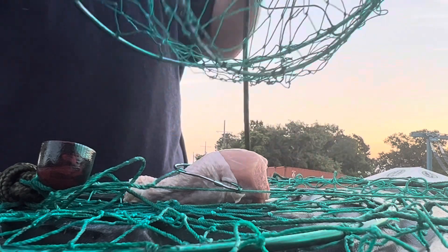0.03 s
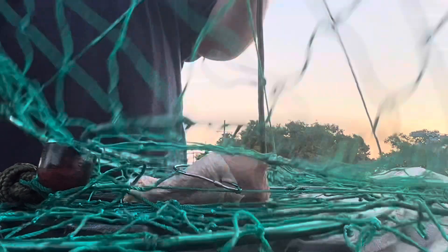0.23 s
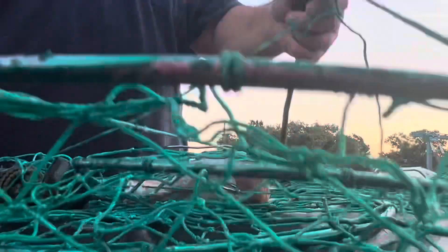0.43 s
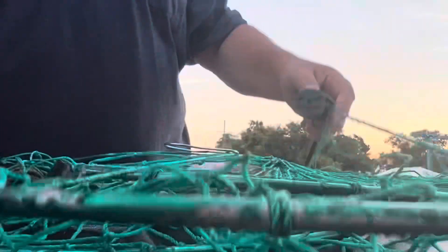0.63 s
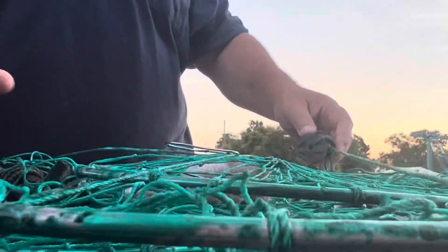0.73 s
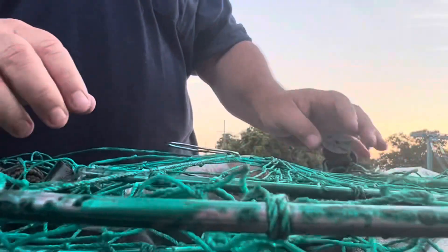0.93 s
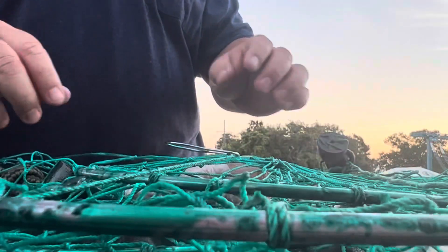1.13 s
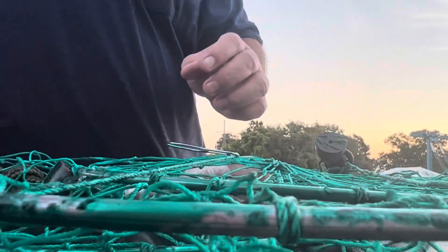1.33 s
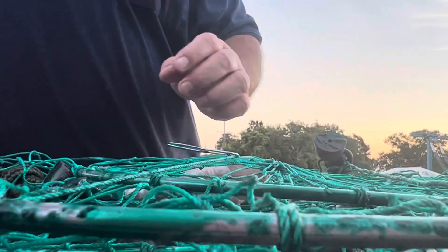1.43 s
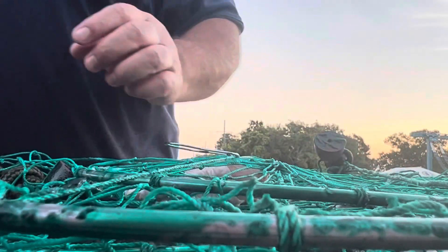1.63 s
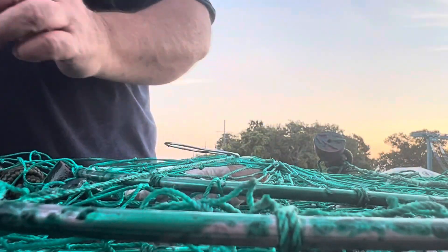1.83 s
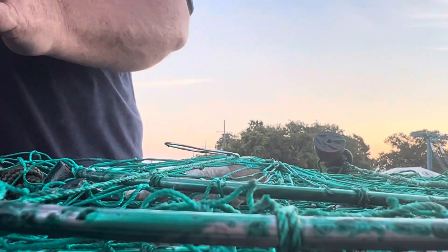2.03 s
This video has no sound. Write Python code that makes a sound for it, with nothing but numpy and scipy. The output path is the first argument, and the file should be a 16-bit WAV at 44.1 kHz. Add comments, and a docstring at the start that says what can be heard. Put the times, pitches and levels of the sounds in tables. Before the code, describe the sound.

A netted metal trap slams shut with a clatter, then its netting crackles softly.

```python
"""Shutting a wire crab trap

Close to a stereo microphone, the metal hoop of a netted trap slams onto its frame, bounces and settles,
and the stack of traps under it booms. A hand presses the float down; cord swishes through the mesh,
the frame ticks and the netting crackles. Farther off lie a bird's falling whistles and a soft rumble."""
import sys
import numpy as np
from scipy import signal
from scipy.fft import rfft, irfft, next_fast_len
from scipy.io import wavfile
from scipy.ndimage import map_coordinates

SR = 44100
rng = np.random.default_rng(int(sys.argv[2]) if len(sys.argv) > 2 else 0)


def wrap_up_sound(samples):
    """Save the sound to the file named by the first command line argument, as 16-bit audio."""
    columns = np.atleast_2d(samples).T
    # keep every value between -1 and 1, then stretch to whole-number steps
    tamed = np.clip(columns, -1, 1)
    steps = np.round(tamed * 32767).astype(np.int16)
    wavfile.write(sys.argv[1], SR, steps)


N = 92610

# Hoop on frame. Each row: start in seconds, level in dB, hardness in Hz (half the low-pass cutoff),
# low cut in Hz, share of the ring time, leftward bias in dB.
HOOP_BLOWS = [(0.2243, -10, 8100, 840, 0.48, 2.5), (0.2256, -2, 1200, 435, 0.1, 12.5),
              (.249, -16, 520, 198, 0.65, -1.5), (0.273, -19.5, 600, 149.8, 0.23, 6.5),
              (0.3406, -12.5, 6950, 674, 0.94, 8.5), (0.345, -22.5, 294, 202, 1, -4),
              (.361, -22.5, 1760, 199, 0.87, 5.5), (.377, -22, 1200, 299, 0.72, 4),
              (0.4193, -17, 1180, 316, 0.6, 6), (.427, -18, 600, 197, 0.63, 3.5),
              (0.474, -30, 447, 203, 1, 1), (0.483, -24.5, 800, 200, 0.41, 3.5),
              (0.6, -30, 508, 128, 0.85, 2.5), (0.625, -27, 497, 130, 0.62, 3.5),
              (0.6555, -28, 920, 168, 0.61, -1), (.681, -26.5, 140, 113, 0.81, 0)]
# Ring of the frame and of the steel rod. Each row: pitch in Hz, level in dB, t60 in seconds.
FRAME_MODES = [(194, 1, 0.26), (256, -0.5, 0.18), (286.3, -8, 0.23), (305, -3, 0.18), (351, -5, .16),
               (368, -5, 0.26), (422.5, -3, 0.21), (487.6, -15, 0.15), (568.5, -12, 0.17),
               (599.2, -8.5, 0.15), (634, -10, 0.17), (784, -11, 0.16), (838, -8, 0.12), (904, -2.5, 0.085),
               (985, -7.5, 0.14), (1132, -6.5, 0.066), (1237, -11.5, 0.083), (1438, -16, .08),
               (1586, -15.5, .12), (1759, -10.5, 0.084), (2160, -27, 0.061), (2280, -11, 0.042),
               (2572, -13, 0.075), (4125, -16, 0.055)]
ROD_MODES = [(2570, -7, .3), (3820, -6.5, 0.38), (4640, 4.5, 0.2)]
# A faint tone just before the slam, then hollow knocks of the hoop's tube.
# Each row: start in seconds, level in dB, pitch in Hz, t60 in seconds.
HOLLOW_TONES = [(0.209, -32.5, 486, 0.15), (.2238, -10.5, 930, 0.015), (0.2246, -3, 547, 0.025),
                (0.2298, -6.5, 310, 0.025), (0.2497, -7.5, 303, 0.071), (.2715, -10, 443, 0.026),
                (0.341, -10, 349.4, .14), (0.4201, -17, 424, 0.067), (.477, -23.5, 375, .06),
                (.626, -34, 589, .05), (0.6567, -21, 370.5, .14)]
# Ring of the tube. Each row: pitch ratio, level in dB, share of the ring time.
TUBE_MODES = [(1, 0, 1), (1.7, -12.5, 0.45), (3.02, -18, 0.44)]
# The stack booms; the frame ticks and a hand bumps it twice near 1.8 s. Each row: start in seconds, level in
# dB, pitch in Hz.
STACK_BOOMS = [(0.228, -12, 95.5), (0.232, -22.5, 43), (0.274, -13.5, 100.5), (0.353, -11.5, 94.1),
               (0.395, -15.5, 104.5), (0.439, -13, 100.9), (0.505, -16, 101.8), (0.595, -17, 102.2),
               (0.639, -11, 101.6), (0.704, -24.5, 130.2)]
CONTACT_TICKS = [(1.125, -42, 800), (1.135, -55.5, 1620), (1.197, -33.5, 704), (1.618, -40.5, 900),
                 (1.803, -41.5, 477), (1.814, -39, 400)]
# Ring of the stack. Each row: pitch ratio, level in dB, t60 in seconds.
STACK_MODES = [(.47, -25, 0.74), (1.002, 6.5, 0.15), (1.298, -7.5, 0.24), (2.031, -14, 0.25)]
# Hand on the float. Each row: centre in seconds, level in dB, pitch in Hz, half width in seconds.
FLOAT_THUDS = [(.768, -39, 137, 0.0062), (.881, -23, 126.6, 0.0097), (.925, -38, 141, 0.024),
               (.985, -43, 62.7, 0.014)]
# Short sounds, near and far. Each row: start in seconds, level in dB.
NET_SNAPS = [(1.768, -43), (1.777, -56), (1.818, -39.5), (1.8304, -30), (1.845, -41), (1.884, -36.5),
             (1.911, -37.5), (1.937, -41), (1.99, -47.5), (2.012, -43), (2.021, -45.5), (2.075, -47),
             (2.083, -48.5)]
ROD_SCRAPES = [(0.343, -58), (0.419, -53), (0.515, -50)]
BIRD_WHISTLES = [(.97, -64.5), (1.054, -68)]
# Rise and fall of netting and cord. Each row: time in seconds, level in dB.
RUSTLE_LEVELS = [(.18, -87), (.21, -52), (.223, -30.5), (.24, -44), (.252, -32), (.28, -46.5), (.32, -56),
                 (.338, -39.5), (.40, -73), (.9, -75.5), (1.735, -67.5), (1.775, -51), (1.84, -53.5),
                 (1.87, -69.5), (1.9, -59.5), (1.975, -74), (2.015, -49), (2.05, -65), (2.09, -55.5)]
SWISH_LEVELS = [(.15, -68.5), (.3, -45.5), (.5, -55.5), (.62, -49), (.74, -49.5), (.84, -53), (.93, -64),
                (1.05, -70.5)]
# Tone colour of each noise. Each row: frequency in Hz, relative level in dB.
CLANK_COLOUR = [(60, 3.5), (180, 3), (400, 2.5), (720, -9), (1000, 3), (1500, -8.5), (2500, -9.5),
                (3400, -15), (5300, -12), (8300, -17), (10500, -47.5), (15000, -57.5)]
TWINE_COLOUR = [(200, -4.5), (700, 6.5), (1300, 3.5), (2200, 5.5), (3800, -0.5), (5500, -1), (8500, -6),
                (10000, -27.5), (15000, -15.5)]
SNAP_COLOUR = [(1500, -15), (4500, 3), (8700, 7.5), (10000, -11), (15000, -8.5)]
CORD_COLOUR = [(300, 25), (1000, 6.5), (2500, -3), (4500, 5), (6500, 4), (8500, 1), (10000, -21),
               (12000, -6.5), (15000, -23.5)]
RUMBLE_COLOUR = [(25, -15.5), (60, -1.5), (117, -1), (150, -11), (335, -11), (550, -15.5), (800, -16.5),
                 (1200, -31), (2000, -36.5), (6500, -40), (8000, -72.5), (10000, -65), (12000, -44),
                 (16000, -60)]
HISS_COLOUR = [(3500, -18.5), (4300, -2), (5200, -19.5), (6200, 4), (6800, 5.5), (7300, -55), (9000, -19.5)]
# Decay in the wires and in the yard. Each row: frequency in Hz, t60 in seconds.
CLANK_T60 = [(150, 0.73), (500, 0.051), (1500, 0.15), (4000, 0.065), (10000, 0.015)]
YARD_T60 = [(150, 0.074), (500, 0.74), (2000, .35), (8000, 0.23)]
# Likeness of left and right for near and far noise. Each row: frequency in Hz, correlation.
NEAR_LIKENESS = [(100, 0.35), (300, 1), (1000, 0.31), (2500, 0.185), (7000, 0.099)]
FAR_LIKENESS = [(100, 0.97), (300, 0.56), (700, 0.23), (1500, -0.16), (5000, -0.24)]
# Tilt of the microphone's stereo colouring. Each row: frequency in Hz, left over right in dB.
STEREO_TILT = [(300, 0), (600, 7), (900, 3), (1200, -3), (2400, 0.5), (3200, 2.5), (4600, 6), (6000, 5.5),
               (7500, -3.5), (14000, -4.5)]
# Phase shift of its stereo processing. Each row: frequency in Hz, lead of the left side in radians.
STEREO_PHASE = [(100, 0.5), (300, 1), (550, 0.85), (900, 3), (2500, 3.5), (5000, 6), (8000, 0.56)]


def hoop():
    """Each close blow cracks, clanks through the wires and rings the frame; soft blows are duller."""
    out, t = np.zeros((2, N)), np.arange(SR // 3) / SR
    for start, db, hardness_hz, low_cut_hz, share, pan_db in HOOP_BLOWS:
        clank = dying(stereo_noise(len(t), CLANK_COLOUR, NEAR_LIKENESS), CLANK_T60, share)
        clank *= 1 + amp(-7) * np.exp(-t / 0.0031)  # crack at first contact
        ring = 0
        for hz, mode_db, t60 in FRAME_MODES:
            decay = amp(mode_db + rng.normal(0, 1.6, (2, 1)) - 60 * t / (t60 * share))
            phase = rng.random() + 0.11 * rng.standard_normal((2, 1))  # cycles, left and right
            ring += decay * np.sin(2 * np.pi * (hz * t + phase))
        blow = (amp(-2.5) * clank + ring) * attack(t, rise_s=0.00067)
        blow = signal.lfilter(*signal.butter(2, min(2 * hardness_hz, .45 * SR), fs=SR), blow)
        blow = signal.lfilter(*signal.butter(2, low_cut_hz, "high", fs=SR), blow)
        add(out, start, amp(db) * pan(pan_db) * blow)
    return out


def tube():
    """A faint low tone leads into the slam; hollow knocks follow, pitched by where the tube is struck."""
    out, t = np.zeros((2, N)), np.arange(SR // 4) / SR
    for start, db, hz, t60 in HOLLOW_TONES:
        tone = sum(mode(t, ratio * hz, mode_db, t60 * share) for ratio, mode_db, share in TUBE_MODES)
        add(out, start, amp(db) * pan(1) * tone * attack(t, rise_s=0.00089))
    return out


def stack():
    """The traps underneath give way under the weight and boom."""
    out, t = np.zeros((2, N)), np.arange(SR // 2) / SR
    for start, db, hz in STACK_BOOMS:
        boom = sum(mode(t, ratio * hz, mode_db, t60) for ratio, mode_db, t60 in STACK_MODES)
        add(out, start, amp(db) * pan(4.5) * boom * attack(t, rise_s=0.012))
    return out


def float_press():
    """A hand pushes the float home with a few soft thuds."""
    out = np.zeros(N)
    for centre, db, hz, width_s in FLOAT_THUDS:
        t = np.arange(N) / SR - centre
        phase = 2 * np.pi * hz * t
        tone = np.cos(phase) + amp(-21) * np.cos(1.78 * phase)
        out += amp(db) * np.exp(-(t / width_s) ** 2) * tone
    return pan(4.5) * out


def netting(grains_per_s=2500, spread_db=2.5):
    """Stiff twine rustles in tiny grains near the microphone, with crisp snaps on top."""
    grains = (rng.random((2, N)) < grains_per_s / SR) * rng.standard_normal((2, N))
    grains *= amp(spread_db * rng.standard_normal(N))
    out = stereo(grains, TWINE_COLOUR, NEAR_LIKENESS) * level(RUSTLE_LEVELS)
    t = np.arange(SR // 20) / SR
    for start, db in NET_SNAPS:
        body = stereo_noise(len(t), TWINE_COLOUR, NEAR_LIKENESS) * np.exp(-t / 0.0099)
        crack = stereo_noise(len(t), SNAP_COLOUR, NEAR_LIKENESS) * np.exp(-t / 0.0021)
        add(out, start, amp(db) * (amp(-8) * body + amp(3) * crack) * attack(t, rise_s=0.0015))
    return pan(3.1) * out


def ticks(rise_s=0.00093):
    """Small dull contacts as the frame settles, and two soft handling thuds near 1.8 s, each only a few cycles
    long."""
    out, t = np.zeros((2, N)), np.arange(SR // 20) / SR
    envelope = t / rise_s * np.exp(1 - t / rise_s)
    for start, db, hz in CONTACT_TICKS:
        add(out, start, amp(db) * pan(1) * envelope * np.sin(2 * np.pi * hz * t))
    return out


def cord():
    """The cord swishes as it slides through the mesh, left of centre."""
    return pan(4.8) * stereo_noise(N, CORD_COLOUR, NEAR_LIKENESS) * level(SWISH_LEVELS)


def rod():
    """The scraped steel rod rings faintly through the clatter."""
    out, t = np.zeros((2, N)), np.arange(SR // 3) / SR
    for start, db in ROD_SCRAPES:
        ring = sum(mode(t, hz, mode_db, t60, rng.random((2, 1))) for hz, mode_db, t60 in ROD_MODES)
        add(out, start, amp(db) * ring * attack(t, rise_s=0.014))
    return pan(4.8) * out


def bird(start_hz=4620, low_hz=3650, hold_hz=4040, fall_s=0.046, lift_after_s=0.11, fade_db_per_s=56):
    """Far off to the left, each whistle falls, lifts and holds, fluttering as it fades among trees."""
    out, t = np.zeros((2, N)), np.arange(SR // 4) / SR
    fall = (start_hz - low_hz) * np.exp(-(t / fall_s) ** np.sqrt(2))
    lift = np.clip(4000 * (t - lift_after_s), 0, hold_hz - low_hz)
    edges = np.clip(np.minimum(t, t[-1] - t) / 0.01, 0, 1)
    for start, db in BIRD_WHISTLES:
        hz = low_hz + fall + lift + 40 * flutter(t)
        envelope = edges * amp(db - fade_db_per_s * t + 4 * flutter(t))
        add(out, start, pan(10.8) * envelope * np.sin(2 * np.pi * np.cumsum(hz) / SR))
    return out + echo(out, [(4000, .3)])  # t60 of 0.3 s at every pitch


def open_air():
    """Steady outdoor rumble and a thin far hiss; the treble leans left."""
    rumble = amp(-51.5) * stereo_noise(N, RUMBLE_COLOUR, FAR_LIKENESS)
    hiss = amp(-72.5) * stereo_noise(N, HISS_COLOUR, FAR_LIKENESS)
    lean = [(100, 0), (2000, 2), (4500, 14.5), (6800, 10), (10000, -2.5)]  # Hz, left over right in dB
    return filtered(rumble + hiss, lambda hz: amp(np.outer([.5, -.5], along(lean, hz))))


def amp(db):
    """Gain from decibels."""
    return 10 ** (np.asarray(db) / 20)


def along(points, hz):
    """A curve through (Hz, value) points on a log frequency axis."""
    freqs, values = np.transpose(points)
    return np.interp(np.log(hz + 1), np.log(freqs + 1), values)


def level(points):
    """Gain per sample from (seconds, dB) points."""
    return amp(np.interp(np.arange(N) / SR, *np.transpose(points)))


def attack(t, rise_s):
    """A smooth rise from silence to 1."""
    return 1 - np.exp(-t / rise_s)


def mode(t, hz, db, t60, phase=0):
    """One resonance, falling 60 dB in t60 seconds; phase is in cycles."""
    return amp(db - 60 * t / t60) * np.sin(2 * np.pi * (hz * t + phase))


def flutter(t, knots_per_s=270):
    """A smooth random curve."""
    return map_coordinates(rng.standard_normal(size=512), [t * knots_per_s], mode="mirror")


def pan(db):
    """Channel gains with the left db above the right."""
    return amp(np.array([[db], [-db]]) / 2)


def add(track, start, sound):
    """Mix a sound in at start seconds."""
    part = track[:, round(start * SR):][:, :sound.shape[1]]
    part += sound[:, :part.shape[1]]


def filtered(x, response):
    """Shape x by a response given as a function of frequency."""
    n = x.shape[-1]
    padded = next_fast_len(n + 4096)
    return irfft(rfft(x, padded) * response(np.fft.rfftfreq(padded, 1 / SR)), padded)[..., :n]


def stereo(pair, colour, likeness):
    """Blend two unrelated signals into a coloured, partly alike stereo pair of rms 1."""
    def mid_side(hz):
        angle = np.arccos(np.clip(along(likeness, hz), -1, 1)) / 2
        return amp(along(colour, hz)) * [np.cos(angle), np.sin(angle)]
    mid, side = filtered(pair, mid_side)
    out = np.array([mid + side, mid - side])
    return out / np.sqrt(np.mean(out ** 2) + 1e-20)


def stereo_noise(n, colour, likeness):
    """Coloured stereo noise, n samples long."""
    return stereo(rng.standard_normal((2, n)), colour, likeness)


def dying(x, t60s, share=1):
    """Each frequency of x dies at its own speed; share scales the ring time."""
    hz, t, spectrum = signal.stft(x, SR, nperseg=256)
    decay = amp(-60 * t / (share * along(t60s, hz)[:, None]))
    return signal.istft(spectrum * decay, SR, nperseg=256)[1][:, :x.shape[1]]


def echo(x, t60s):
    """The diffuse stereo tail that the surroundings return."""
    tail = dying(rng.standard_normal((2, SR // 2)), t60s)
    return signal.fftconvolve(x, tail / np.linalg.norm(tail[0]), axes=1)[:, :N]


def stereo_colouring(hz):
    """The microphone's stereo colouring: a left-right tilt and phase shift that widen the clatter."""
    left = amp(along(STEREO_TILT, hz) / 2) * np.exp(.5j * along(STEREO_PHASE, hz))
    return np.array([left, 1 / left])


def scene():
    """The trap up close, the yard's faint answer, and the bird and open air behind."""
    clatter = filtered(hoop() + tube() + netting(), stereo_colouring)
    trap = clatter + stack() + float_press() + cord() + rod() + ticks()
    return trap + amp(-26) * echo(trap, YARD_T60) + bird() + open_air()


def record(dry):
    """The loudest peaks are rounded off; nothing passes above the band limit."""
    rounded = dry / (1 + dry ** 8) ** (1 / 8)
    return filtered(rounded, lambda hz: hz < 15900)


dry = scene()
out = record(dry)
wrap_up_sound(out)
```